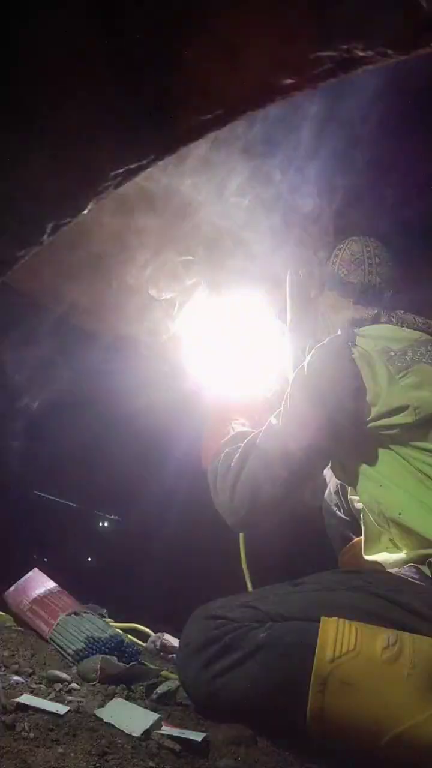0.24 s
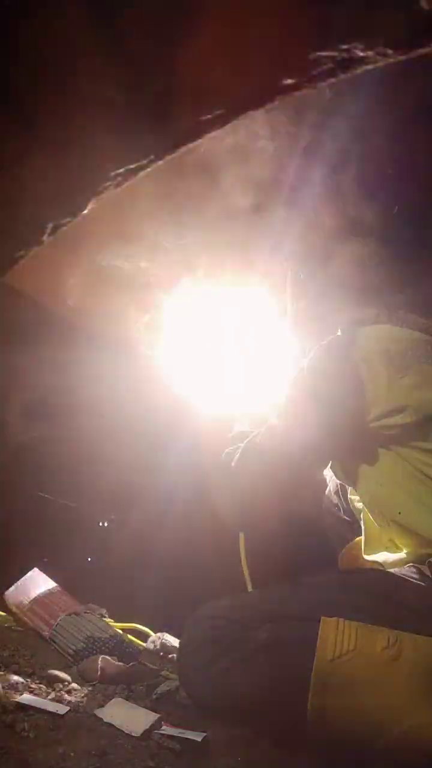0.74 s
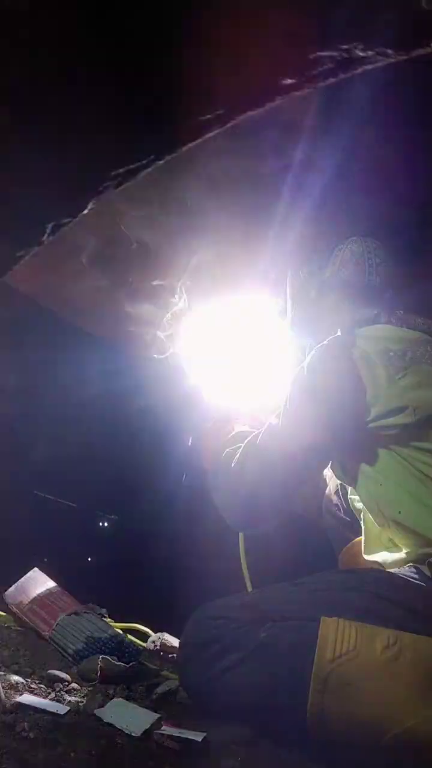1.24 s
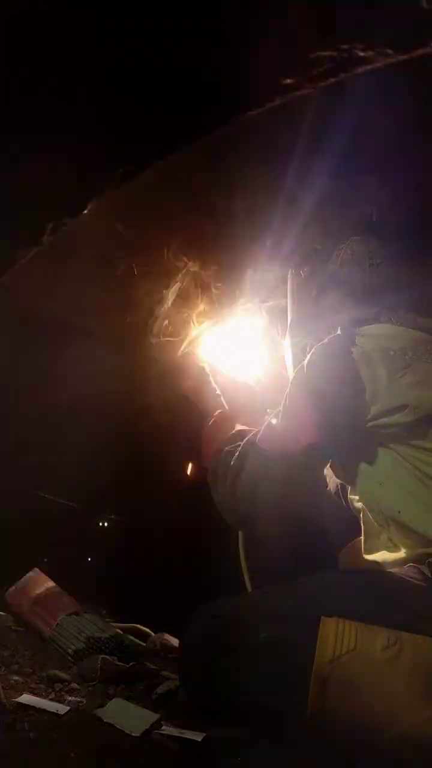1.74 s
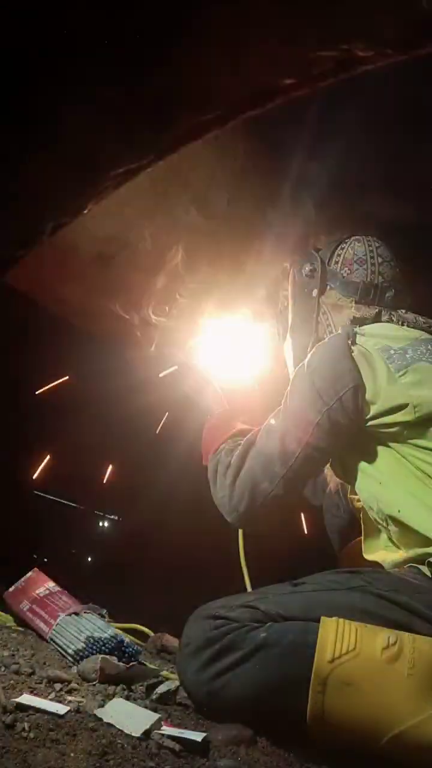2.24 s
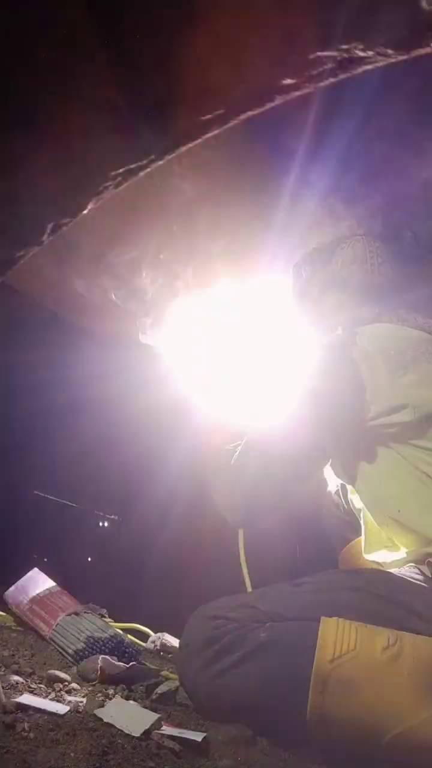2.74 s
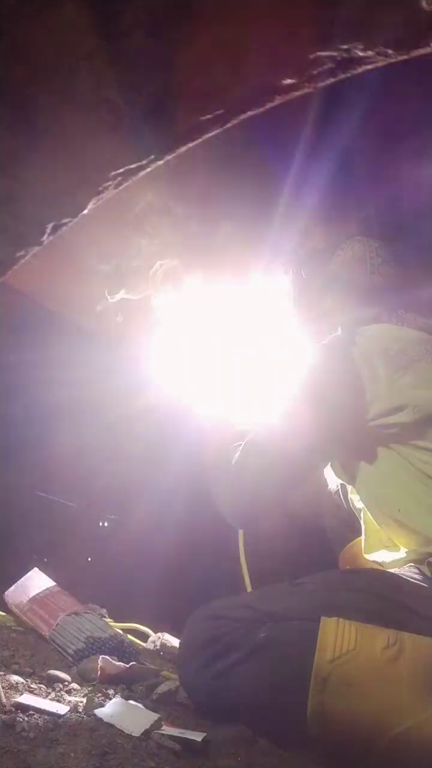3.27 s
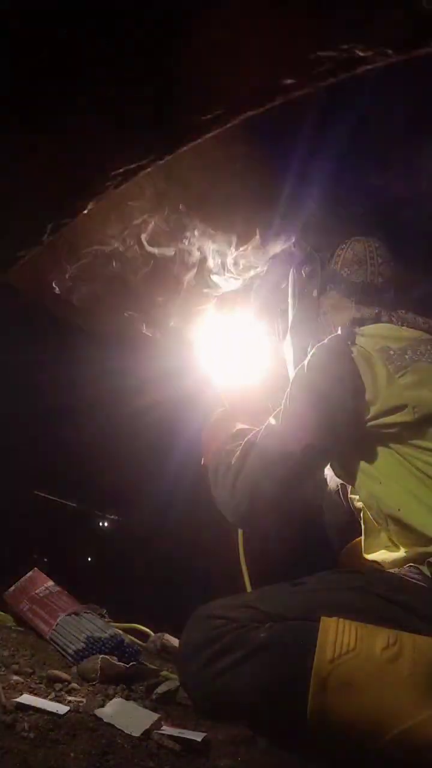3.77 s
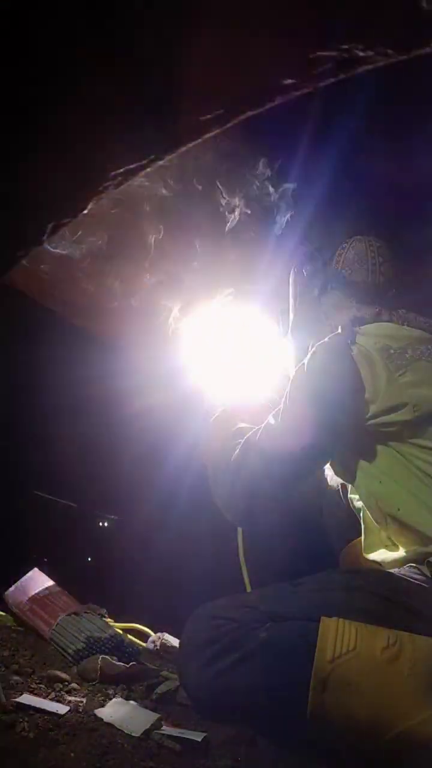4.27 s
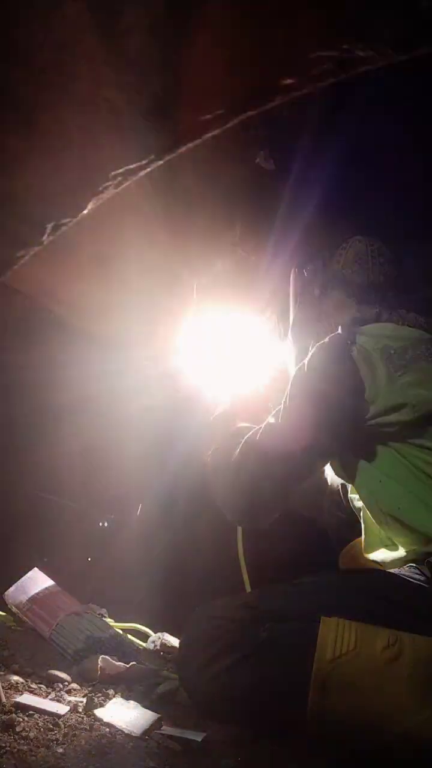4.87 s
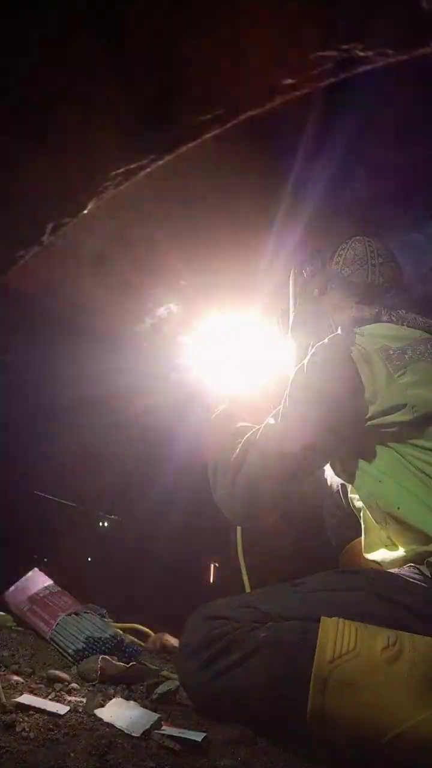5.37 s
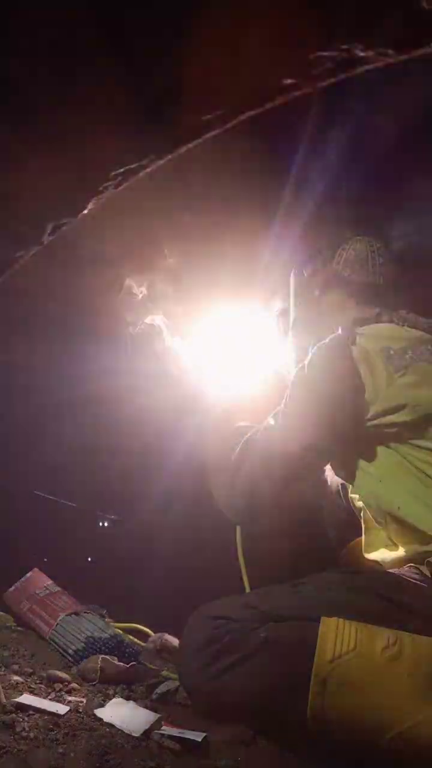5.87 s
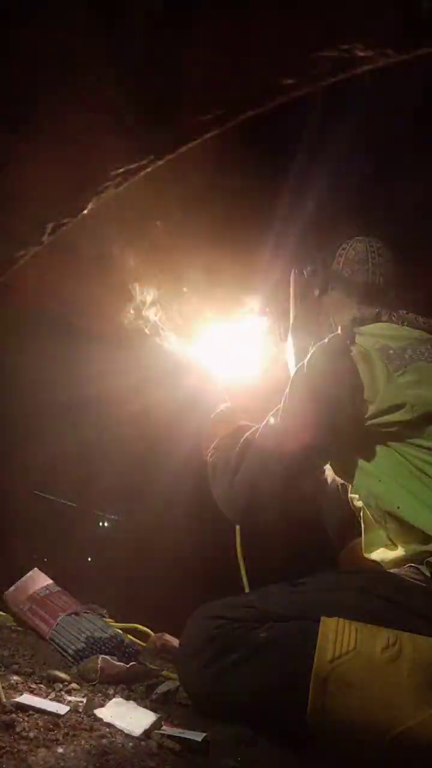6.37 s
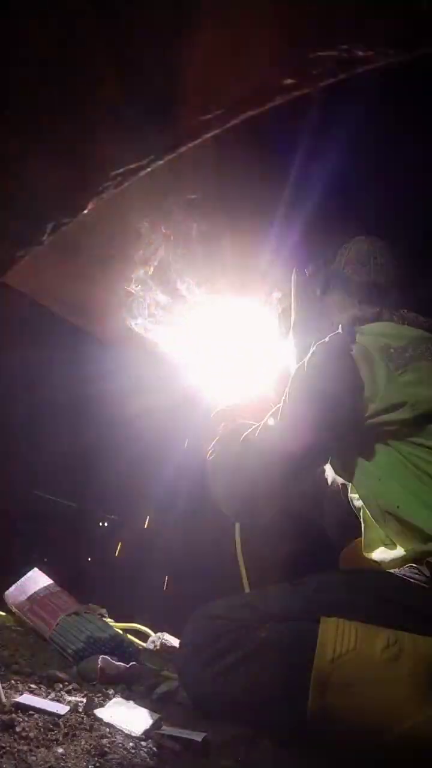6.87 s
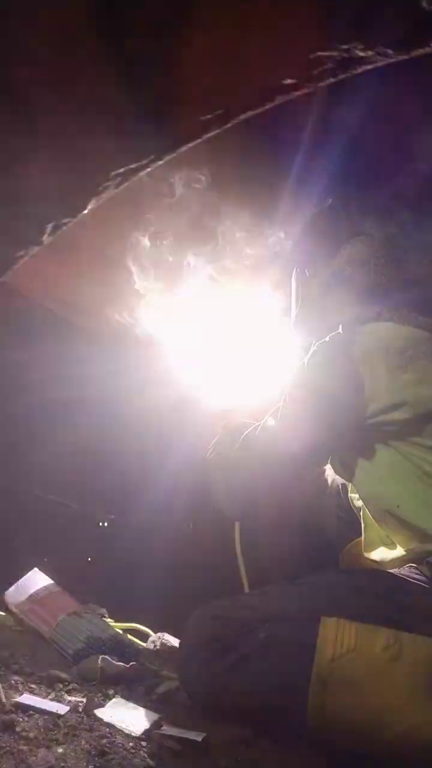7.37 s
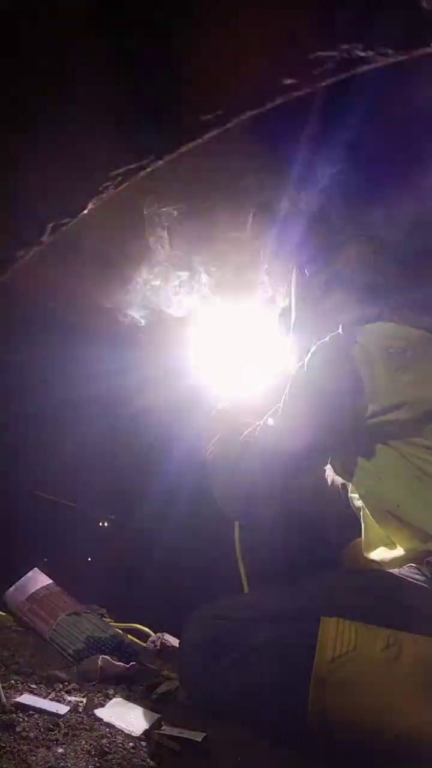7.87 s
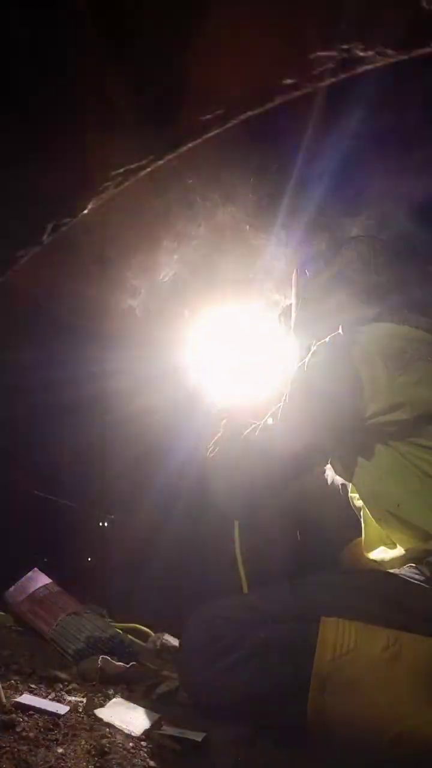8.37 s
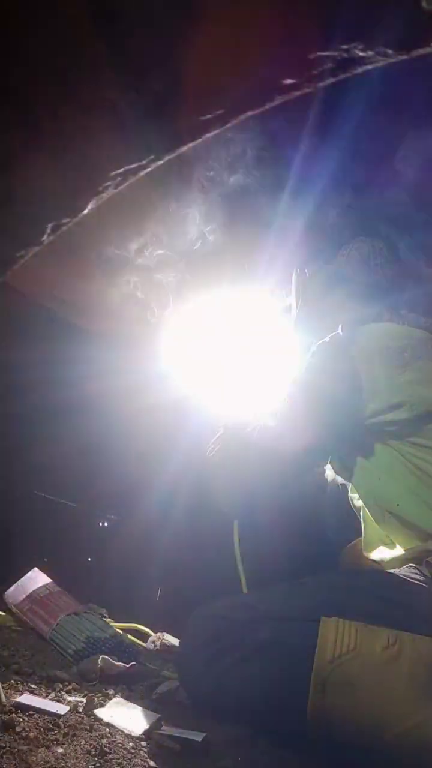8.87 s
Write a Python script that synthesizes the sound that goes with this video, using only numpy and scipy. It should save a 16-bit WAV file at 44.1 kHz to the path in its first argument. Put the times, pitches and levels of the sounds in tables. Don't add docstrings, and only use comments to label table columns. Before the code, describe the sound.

Continuous close arc welding: gritty, high-pitched frying with irregular dry crackles and dull pops as molten drops short the arc. The sizzle dips briefly around each pop and springs back, the automatic gain pumping jerkily. Two big thumping overloads stand out, one in the first third and one late. Beneath lies soft, uneven engine rumble and moving air, with weak distant squeals near the start, in an open outdoor place.

```python
import sys
import numpy as np
from scipy import signal
from scipy.fft import rfft, irfft
from scipy.io import wavfile
from scipy.ndimage import uniform_filter1d

SR = 44100
rng = np.random.default_rng(int(sys.argv[2]) if len(sys.argv) > 2 else 0)


def to_linear_factor(level_db):
    exponent = np.asarray(level_db, float) / 20
    return 10 ** exponent


def transcribe(signal):
    frames = np.atleast_2d(signal).T
    limited = np.clip(frames, -1, 1)
    pcm = np.round(limited * 32767).astype(np.int16)
    wavfile.write(sys.argv[1], SR, pcm)


N = 402191

# time_s, peak_db, rebound [0-1]
POPS = [(0.1983, -25.6, 0.33), (0.3752, -31.2, 0.14), (0.5501, -28.7, 0.51), (0.5794, -33.6, 0.98),
        (1.0848, -30.3, 0.3), (2.3816, -32.1, 0.02), (2.7333, -9.1, 0.0), (2.9993, -29.7, 0.89),
        (3.1792, -25.3, 0.61), (3.3671, -19.8, 0.26), (3.632, -20.2, 0.09), (3.9442, -25.8, 0.78),
        (4.1047, -16.3, 0.0), (4.4698, -26.9, 0.4), (5.0693, -18.3, 0.46), (5.3159, -16.6, 0.05),
        (5.5607, -17.8, 0.47), (5.6389, -26.9, 0.61), (5.8399, -28.5, 0.31), (5.9673, -20.2, 0.32),
        (6.2669, -28.4, 0.17), (6.4519, -24.6, 0.99), (6.7348, -27.9, 0.46), (7.6517, -26.2, 0.41),
        (7.8712, -12.9, 0.0), (8.3183, -32.1, 0.56), (8.4425, -19.6, 0.29), (8.7203, -26.3, 0.28),
        (8.9613, -30.9, 0.42), (9.0191, -21.8, 0.02)]
FAINT_POPS = [.8133, .8534, 1.4067, 2.8013, 3.9161, 4.4549, 4.9753, 5.5411, 6.3524, 6.8006, 6.9285, 7.3083,
              8.9376]
FAINT_DB, FAINT_REBOUND = -38, 0.14
POP_SNAP_DB, FAINT_SNAP_DB = -18.5, -21.0
# time_s, peak_db
CRACKLES = [(.5124, -17), (.6695, -15), (1.514, -16), (1.5234, -16), (1.6432, -17), (1.7675, -14),
            (2.3229, -17), (2.6376, -13), (3.1418, -17), (3.1591, -17), (3.6113, -16), (3.6166, -15),
            (4.2721, -16), (4.2906, -14), (4.7026, -15), (4.9663, -16), (5.2127, -17), (5.4829, -17),
            (5.7325, -16), (5.7947, -17), (5.9526, -14), (6.1394, -16), (6.2064, -15), (6.5881, -19),
            (7.0808, -14), (7.1616, -14), (7.6424, -15), (8.2447, -15), (8.6954, -15), (8.8396, -14)]
# time_s, peak_db
SPITS = [(.0928, -21), (.147, -27), (.1782, -26), (.2844, -19), (.6382, -19), (.7199, -19), (1.0717, -19),
         (1.1749, -21), (1.195, -17), (1.4298, -30), (1.8516, -19), (1.8623, -21), (2.907, -17),
         (2.9514, -19), (3.0751, -20), (3.2375, -24), (3.4361, -23), (3.7704, -19), (3.7977, -19),
         (4.3727, -21), (4.4389, -23), (4.8048, -19), (5.6311, -22), (5.8276, -19), (6.187, -18),
         (6.7284, -21), (7.7354, -21), (7.8229, -21), (8.161, -27), (8.5267, -24)]
STRAY_COUNT, STRAY_TOP_DB = 125, -18.5
STRAY_DB, STRAY_SPREAD_DB, STRAY_FOLLOW = -25, 5, 0.99
STRAY_DRAWS = rng.random((STRAY_COUNT, 2))
# [signed amplitude, 1 ms]
OVERLOADS = [
    (2.7333, .08, .14),
    (4.1047, .022, .03),
    (5.0693, -.03, -.01),
    (5.3159, .026, .03),
    (5.5607, -.022, -.01),
    (5.9673, -.01, 0.0),
    (7.8712, .058, .09),
    (8.4425, -.016, 0.0),
]
# pitch_hz, level_db [per Hz]
ARC_COLOUR = [(880, -55), (1500, -28), (2500, -24), (4100, -19), (6500, -21), (7100, -20), (7500, -13),
              (8300, -14), (8800, -21), (10000, -21), (11000, -15), (13700, -10), (15400, 0), (17500, -22)]
# pitch_hz, width_hz, level_db
ECHO_DENTS = [(3050, 140, -7), (3720, 280, -8), (4420, 170, -9), (5300, 220, -6), (6150, 120, -7),
              (6550, 150, -4), (6970, 120, -7), (9050, 120, -5), (9300, 120, -5), (9550, 150, 4),
              (9750, 150, -7), (10080, 150, -9), (10680, 130, -10), (11150, 200, -4), (11550, 130, -8),
              (11900, 250, -3), (12480, 120, -4), (12700, 200, 3), (12950, 130, -6), (13400, 200, -7),
              (13870, 150, -6), (14500, 200, -6), (14850, 150, 3), (15030, 120, -3), (15500, 350, 3)]
# pitch_hz, level_db [per Hz]
RUMBLE_COLOUR = [(8.8, -22), (15, 1.5), (43, 2), (110, -8), (161, -13), (229, -13), (274, -26),
                 (456, -21.5), (695, -22.5), (776, -25.5), (867, -24), (1440, -34.5), (1580, -35),
                 (2010, -82), (3000, -34.5), (3900, -42.5), (6600, -120)]
# pitch_hz, width_hz, level_db
ENGINE_HUMS = [
    (31.8, 10, -52),
    (56, 14, -59),
    (104, 20.5, -43),
    (170, 21, -56),
]
# start_s, loudest_s, end_s, pitch_hz, level_db
SQUEALS = [
    (.93, 1.06, 1.57, 4140, -52),
    (1.15, 1.49, 1.92, 3405, -52),
    (1.28, 1.45, 1.8, 4405, -60),
    (1.9, 2.0, 2.3, 4405, -62),
]
# time_s, level_db
OPEN_TOP = [(0.197, -31), (0.2833, -32), (0.6374, -32), (1.1932, -54), (2.3216, -30), (2.3805, -27),
            (2.6364, -30), (2.9981, -28), (3.0729, -46), (3.7963, -52), (4.8025, -25), (5.5398, -10),
            (5.9509, -30), (7.6405, -22), (7.7338, -26), (7.8211, -37), (8.5255, -38), (8.6941, -35)]
# start_s, ducked_gain_db, hold_s, leap_gain_db
DUCKS = [(0.184, -12, 0.099, 6), (0.367, -6, 0.092, 5), (0.545, -3.5, 0.1, 3), (0.814, -5, 0.1, 5),
         (1.077, -7.5, 0.35, 6), (1.4, -9.5, .096, 10.5), (1.863, -6.5, 0.12, 8), (2.734, -18, 0.04, -7),
         (3.002, -7.5, .093, 0.9), (3.169, -7.5, .111, 4.5), (3.365, -11.5, 0.085, -1),
         (3.643, -11.5, 0.078, 3.5), (3.767, -7, 0.095, 2), (3.912, -7, .12, 8.5),
         (4.102, -13.5, .101, 3.5), (4.37, -9.5, 0.19, 3), (5.067, -9.5, 0.089, 4.5),
         (5.308, -10.5, 0.092, 1.5), (5.534, -9, 0.25, 3), (5.83, -6, .094, 4), (5.967, -11, 0.092, 7.5),
         (6.457, -6.5, 0.079, 2), (6.734, -9.5, .1, -6), (6.928, -6.5, 0.1, 9), (7.649, -8.5, 0.15, 3.5),
         (7.871, -15, .081, 7.5), (8.442, -10.5, 0.081, 4.5), (8.717, -10.5, 0.099, 9.5),
         (9.02, -9.5, 0.12, 1.5)]
# start_s, ducked_gain_db, hold_s, leap_gain_db
CHECKS = [(0.0, 4, .019, 8.5), (0.083, -8, .1, -9), (0.9, -2.5, .052, 4.5), (1.268, 0, .08, 4.5),
          (1.534, -2.5, .091, 5), (2.079, 8, .14, 1.5), (2.344, -2.5, .119, 2.5), (2.63, -1, .11, -1.5),
          (2.83, -2, .06, -5), (2.883, 3, 0.022, -2), (8.016, 3, .04, 2.5), (3.618, -14, .04, -5),
          (4.067, 2.5, .05, .6), (4.269, -1.4, .12, -.6), (4.616, 3.5, .06, 8.5), (4.733, 0.5, .125, 6.5),
          (4.966, -5, .11, -4), (5.231, -0.8, .09, -.6), (5.693, -3, .032, 4.5), (6.175, -2.5, .28, -1.5),
          (6.833, -2, .1, -1.5), (7.188, 0.6, .12, 1.9), (7.302, -3.5, .098, 2.3), (7.679, -2.5, .142, 5),
          (8.041, -1.8, .172, 6.5), (8.27, -0.3, .154, 11), (8.432, 1, .02, .6), (8.598, 0.5, .042, 9),
          (8.688, -1, .04, 0), (8.927, -4, .1, -2.2)]
CREEP_DB_PER_S, CREEP_TOP_DB = 9.5, -3.5
REST_DB, SETTLE_S = 0.5, 0.33
# time_s, level_db
VIGOUR = [(0.0, 0), (.4, 5.5), (.7, 2.5), (1.3, 5.5), (1.85, 5.5), (2.05, 1), (2.33, -5), (2.44, 1.5),
          (2.95, 6.5), (3.6, 6), (4.9, 4), (5.15, 5.5), (6.1, 2), (6.55, 6.5), (7.0, 3.1), (7.45, 3.5),
          (8.3, 3.5), (9.12, 6)]
QUENCH_DB, RELIGHT_S, FLICKER_DB = 6.5, 0.072, 1.38
SHORT_DB, SHORT_S = 2, 0.0077
QUIET_SHARE = 0.059


def rms_one(x):
    return x / np.sqrt(np.mean(x ** 2) + 1e-20)


def drift(rate_hz):
    r = np.exp(-2 * np.pi * rate_hz / SR)
    noise = rng.standard_normal(N + SR)
    wander = signal.lfilter([1], [1, -2 * r, r * r], noise)
    return rms_one(wander[SR:])


def coloured(x, spectrum, dents=()):
    size = 16384
    hz = np.maximum(np.arange(size // 2 + 1) * SR / size, 1)
    pitch_hz, level_db = np.transpose(spectrum)
    db = np.maximum(np.interp(np.log(hz), np.log(pitch_hz), level_db), -70)
    for centre_hz, width_hz, dent_db in dents:
        db = db + dent_db / (1 + (2 * (hz - centre_hz) / width_hz) ** 2)
    cepstrum = irfft(db * np.log(10) / 20)
    cepstrum[1:size // 2] *= 2
    cepstrum[size // 2 + 1:] = 0
    response = irfft(np.exp(rfft(cepstrum)))
    return signal.fftconvolve(x, response / np.abs(response).max())[:N]


def clicks(times, sizes):
    out = np.zeros(N)
    place = np.round(np.array(times) * SR).astype(int)
    np.add.at(out, np.minimum(place, N - 1), sizes)
    return out


def since(times):
    t = np.arange(N) / SR
    latest = np.maximum(np.searchsorted(times, t, "right") - 1, 0)
    return latest, t - times[latest]


def gain_db():
    start_s, ducked_db, hold_s, leap_db = np.transpose(sorted(DUCKS + CHECKS))
    k, age = since(start_s)
    ceiling = np.maximum(ducked_db[k], CREEP_TOP_DB)
    creeping = np.minimum(ducked_db[k] + CREEP_DB_PER_S * age, ceiling)
    fade = np.exp(-np.maximum(age - hold_s[k], 0) / SETTLE_S)
    settling = REST_DB + (leap_db[k] - REST_DB) * fade
    return uniform_filter1d(np.where(age < hold_s[k], creeping, settling), size=66)


def snap_rows():
    gain = gain_db()
    when, size = STRAY_DRAWS.T
    when = (np.arange(STRAY_COUNT) + when) / STRAY_COUNT * (N - 600) + 300
    stray_db = STRAY_DB + STRAY_SPREAD_DB * (3 * size - 1.5) + STRAY_FOLLOW * gain[when.astype(int)]
    strays = list(zip(when / SR, np.minimum(stray_db, STRAY_TOP_DB)))
    on_pops = [(s + .0001, POP_SNAP_DB) for s, *_ in POPS]
    on_faint = [(s + .0001, FAINT_SNAP_DB + 0.2 * gain[round((s - .003) * SR)]) for s in FAINT_POPS]
    return np.transpose(on_pops + on_faint + CRACKLES + SPITS + strays)


def shorts_db():
    t = np.arange(N) / SR
    s = np.sort(snap_rows()[0])
    following = np.minimum(np.searchsorted(s, t), len(s) - 1)
    ahead = s[following] - t
    return SHORT_DB * (ahead > 0) * np.exp(-(ahead / SHORT_S) ** 2)


def arc_db():
    age = since(np.array(DUCKS)[:, 0])[1]
    quench = QUENCH_DB * (age >= 0) * np.exp(-np.abs(age) / RELIGHT_S)
    vigour = np.interp(np.arange(N) / SR, *np.transpose(VIGOUR)) + FLICKER_DB * drift(12.0)
    return vigour - quench - shorts_db() - QUIET_SHARE * gain_db()


def sizzle(per_s, spread_db, clump_db, hiss_db):
    surge = np.clip(drift(130.0) + .4 * drift(30.0), -3, 1.7)
    size_db = spread_db * np.minimum(rng.exponential(1, N), 3)
    sizes = to_linear_factor(size_db) * rng.choice([-1, 1], N)
    struck = rng.random(N) < per_s / SR
    sparks = rms_one(sizes * struck * to_linear_factor(clump_db * surge))
    hiss = to_linear_factor(hiss_db) * rng.standard_normal(N)
    return to_linear_factor(arc_db()) * rms_one(coloured(sparks + hiss, ARC_COLOUR, ECHO_DENTS))


def rumble():
    waver_db = 1.2 * drift(8.0)
    out = to_linear_factor(-40.0 + waver_db) * rms_one(coloured(rng.standard_normal(N), RUMBLE_COLOUR))
    for hz, width_hz, db in ENGINE_HUMS:
        edges_hz = [hz - width_hz / 2, hz + width_hz / 2]
        band = signal.butter(1, edges_hz, "band", fs=SR, output="sos")
        out += to_linear_factor(db - 8.5) * rms_one(signal.sosfilt(band, rng.standard_normal(N)))
    return out


def crackles(tail_s, tail_db, thinnest):
    s, db = snap_rows()
    length = 512
    age = np.arange(length) / SR
    draws = rng.standard_normal((len(s), length))
    sputter = to_linear_factor(tail_db) * draws * np.exp(-age / tail_s) + (age == 0)
    thin = np.clip(thinnest * rng.random((len(s), 1)), 0, 1)
    sputter = sputter - thin * np.roll(sputter, 1, axis=1)
    ring = coloured(np.eye(1, length)[0], ARC_COLOUR, ECHO_DENTS)
    snaps = signal.fftconvolve(sputter, ring[None])[:, :length]
    power = uniform_filter1d(2 * snaps ** 2, size=25, axis=1)
    snaps *= (to_linear_factor(db + 1) / np.sqrt(power.max(axis=1)))[:, None]
    out = np.zeros(N + length)
    start = np.round(s * SR).astype(int) - power.argmax(axis=1)
    np.add.at(out, start[:, None] + np.arange(length), snaps)
    return out[:N]


def pops():
    faint = [(s, FAINT_DB, FAINT_REBOUND) for s in FAINT_POPS]
    s, db, rebound = np.transpose(POPS + faint)
    swings = clicks(s, to_linear_factor(db)) - clicks(s + .00018, rebound * to_linear_factor(db + 1.5))
    return np.convolve(swings, np.hanning(17), "same")


def squeals():
    t, out = np.arange(N) / SR, 0
    for start, loudest, end, hz, db in SQUEALS:
        moments = [start, loudest, loudest + .12, end - .04, end]
        fade = np.interp(t, moments, [0.2, 1, .5, .3, 0], left=0)
        phase = 2 * np.pi * np.cumsum(hz + 5.0 * drift(6.0)) / SR
        out = out + to_linear_factor(db + 1.5 * drift(9.0)) * fade * np.sin(phase)
    return out


def kicks():
    s, jump, kick = np.transpose(OVERLOADS)
    pushes = clicks(s + .0002, kick + jump) + 1e-18
    tail = signal.lfilter([1], [1, -np.exp(-1 / (.0008 * SR))], pushes)
    return uniform_filter1d(tail, size=9)


def rest_level():
    t, ducked, out = np.arange(N) / SR, to_linear_factor(gain_db()), 0
    for s, jump, _ in OVERLOADS:
        age = np.maximum(t - s, 0)
        true_jump = jump / ducked[round((s + .006) * SR)]
        drain = 1.6 * np.exp(-age / .038) - .6 * np.exp(-age / .14)
        out = out + (t > s + .001) * true_jump * drain
    return uniform_filter1d(out, size=60)


def scene():
    arc = to_linear_factor(-38.5) * sizzle(per_s=6000.0, spread_db=4.0, clump_db=4.5, hiss_db=-9.0)
    bursts = crackles(tail_s=.0007, tail_db=-14.0, thinnest=1.1) + pops() + kicks()
    return (arc + rumble() + squeals() + rest_level() + bursts / to_linear_factor(gain_db()))[None]


def band_limit(x):
    return signal.sosfilt(signal.butter(12, 17150, fs=SR, output="sos"), x)


def top_cut(x, cut_hz):
    taps = signal.firwin(601, cut_hz, window=("kaiser", 9), fs=SR)
    return signal.fftconvolve(x, taps[None], "same")


def record(dry):
    levelled = dry * to_linear_factor(gain_db())
    narrow, wide = top_cut(levelled, 15780), top_cut(levelled, 16550)
    s, db = np.transpose(OPEN_TOP)
    gate = np.convolve(clicks(s + .001, to_linear_factor(db + 27.0)), np.hanning(500), "same")
    mix = narrow + gate * (wide - narrow)
    return band_limit(mix)


dry = scene()
out = record(dry)
transcribe(out)
```